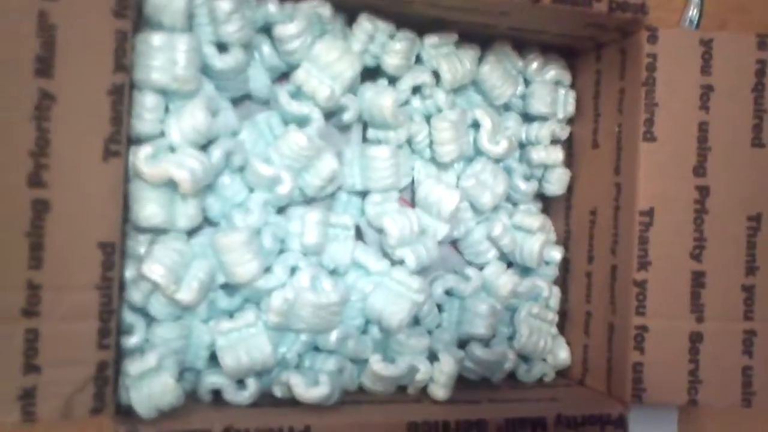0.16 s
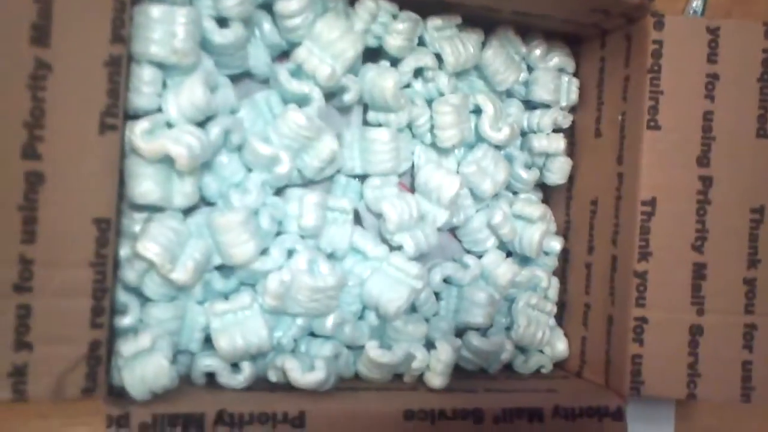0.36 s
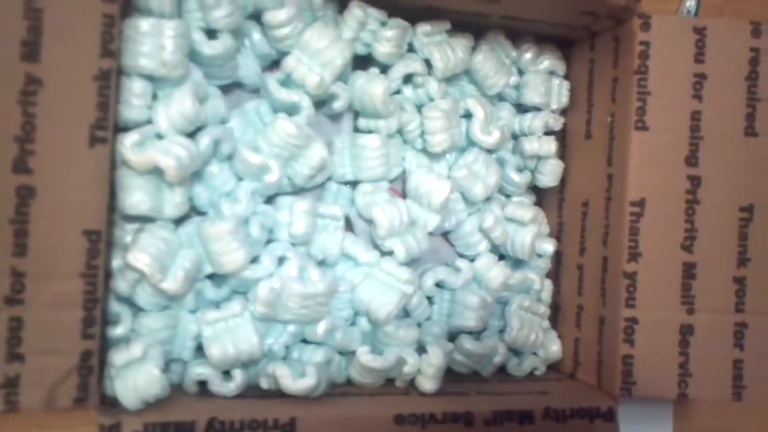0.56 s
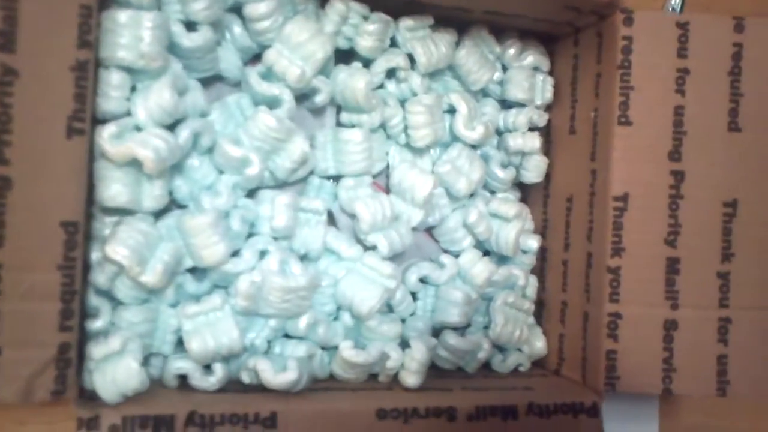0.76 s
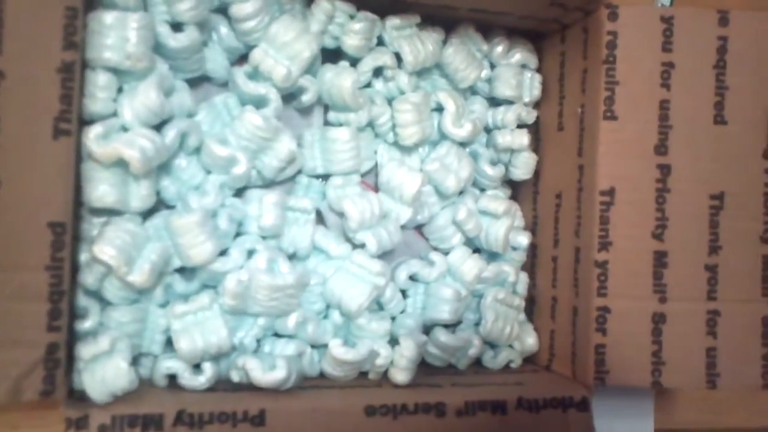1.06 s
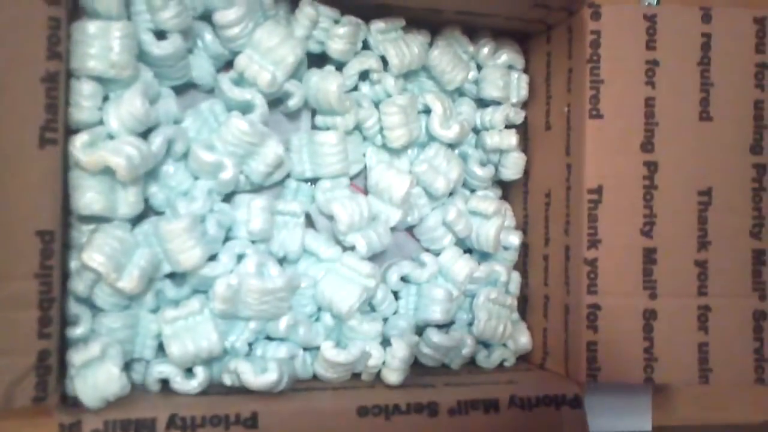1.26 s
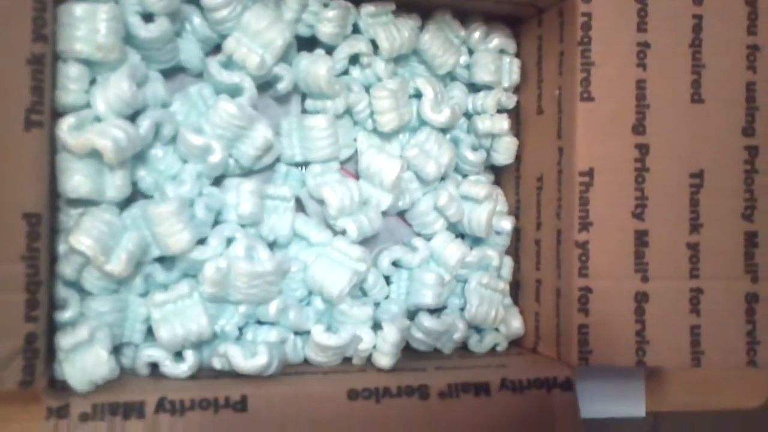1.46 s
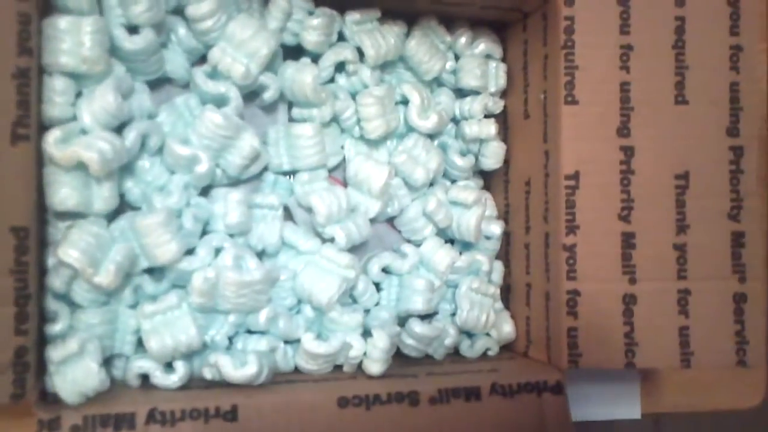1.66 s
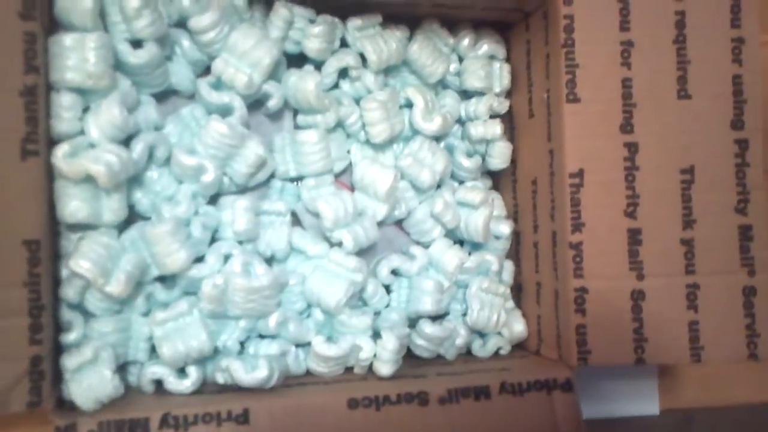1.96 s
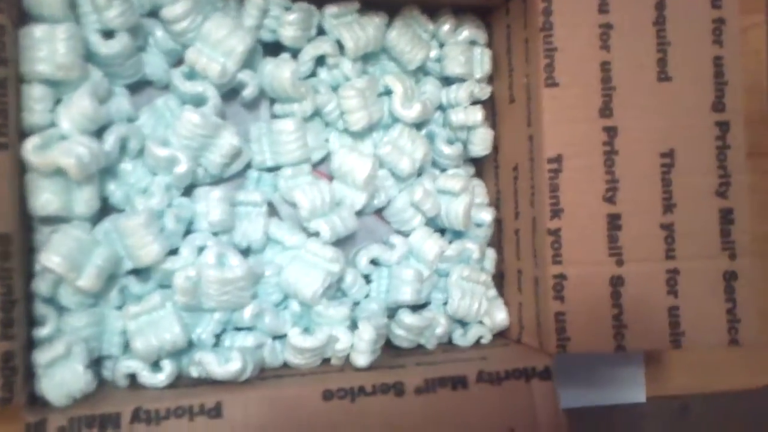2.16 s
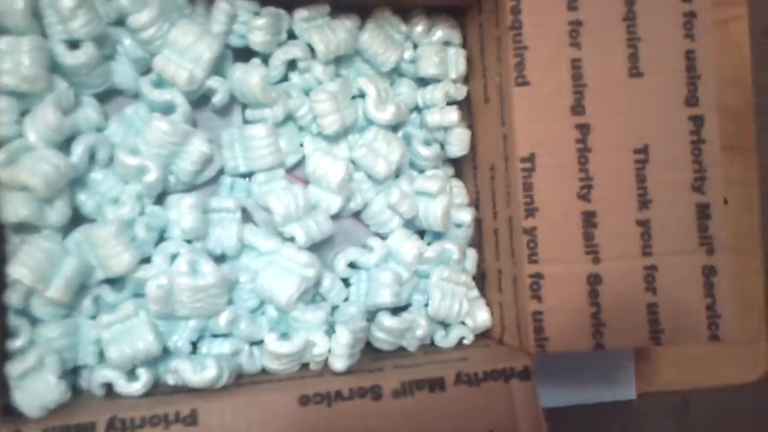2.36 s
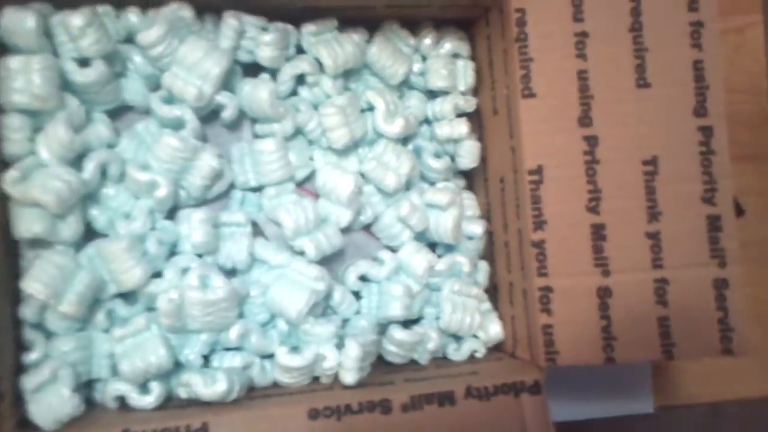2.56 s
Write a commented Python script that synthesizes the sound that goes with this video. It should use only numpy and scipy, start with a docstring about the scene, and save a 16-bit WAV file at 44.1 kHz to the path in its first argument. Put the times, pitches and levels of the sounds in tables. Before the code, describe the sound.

Foam packing peanuts rustle and snap crisply in a cardboard box, with faint low knocks

```python
"""A faint foam rustle and an early crisp snap open the scene; denser rustling, snaps and box knocks follow.
Foam packing peanuts shift in a cardboard box close to a small camera, in a quiet room.
Rustle, wall scrape and rumble are coloured noise under random contacts; snaps are short noise bursts.
Knocks ring the box modes, and the room is steady coloured noise.
The camera widens its two microphone ports by feeding each, inverted and delayed, into the other channel."""
import sys
import numpy as np
from scipy import signal
from scipy.fft import rfft, irfft, next_fast_len
from scipy.io import wavfile

SR = 44100
rng = np.random.default_rng(int(sys.argv[2]) if len(sys.argv) > 2 else 0)


def waveform_to_disk(signal):
    """Save audio, clipped to [-1, 1], as 16-bit WAV at the path in sys.argv[1]."""
    frames = np.transpose(np.atleast_2d(signal))
    scaled = np.clip(frames, -1, 1) * 32767
    samples = np.round(scaled).astype(np.int16)
    wavfile.write(sys.argv[1], SR, samples)


N = 119070  # samples, 2.7 s

# All levels are the mix ahead of the ports and the camera.
# Foam rustle over time: start_s, bright_level_db, dull_level_db
RUSTLE_LEVELS = [(0.0, -59, -60.5), (0.17, -70.5, -72), (0.238, -55, -60), (0.243, -44.5, -74),
                 (0.254, -42.5, -64), (0.26, -59, -61), (0.279, -55, -58), (0.3, -41.5, -57.5),
                 (0.32, -39.5, -43.5), (0.443, -42, -50), (0.444, -35.5, -36.5), (0.49, -53, -52),
                 (0.58, -44, -55), (0.65, -56.5, -58), (0.83, -58, -66), (0.866, -65, -61),
                 (0.875, -50.5, -56), (0.92, -50, -48), (0.94, -57, -61), (1.031, -50.5, -54.5),
                 (1.072, -65, -66), (1.212, -50.5, -51.5), (1.231, -59, -61.5), (1.4, -61.5, -62),
                 (1.44, -69, -66), (1.51, -55, -55.5), (1.65, -49.5, -53.5), (1.741, -58, -57.5),
                 (1.74, -56, -52), (1.79, -61, -62), (1.858, -59.5, -67), (1.866, -51, -56),
                 (1.96, -57, -59.5), (2.0, -55.5, -57.5), (2.18, -56.5, -57.5), (2.251, -49, -48),
                 (2.31, -56.5, -62), (2.391, -50, -53), (2.56, -65.5, -68.5), (2.7, -71, -71)]
# Single snaps of foam: start_s, peak_db (before SNAP_TRIM_DB), centre_hz
FOAM_SNAPS = [(0.033, -33.5, 7000), (0.196, -32.5, 9630), (0.2468, -21.5, 12300), (0.2832, -34, 9650),
              (0.2935, -27, 9490), (0.3013, -32, 9900), (0.3454, -30, 12000), (0.386, -17, 9900),
              (0.4234, -25, 12400), (0.4446, -31, 4600), (0.4472, -17.5, 3540), (0.503, -22.5, 9300),
              (0.5251, -27, 5300), (0.5484, -24, 7900), (0.717, -28, 11900), (0.783, -48, 9500),
              (0.7917, -33, 9500), (0.804, -45, 9500), (0.8073, -46, 9200), (0.831, -38, 9050),
              (0.8447, -42.5, 9000), (0.8733, -41, 9000), (1.0054, -27, 9770), (1.0246, -33.5, 7310),
              (1.1077, -29.5, 9400), (1.1476, -40, 11000), (1.179, -40, 10000), (1.2648, -29, 12000),
              (1.271, -35, 10600), (1.2758, -38, 10000), (1.3413, -35.5, 9960), (1.3683, -41, 11000),
              (1.375, -37.5, 9500), (1.385, -35.5, 8000), (1.3945, -38, 10000), (1.4682, -34, 7260),
              (1.4759, -36, 9120), (1.503, -27, 9600), (1.5504, -22.5, 9600), (1.571, -35, 3410),
              (1.634, -30, 9400), (1.6701, -33, 7300), (1.7465, -21, 10700), (1.7544, -32.5, 7510),
              (1.866, -32.5, 6900), (1.881, -34.5, 9970), (1.9817, -38.5, 3460), (1.989, -29.5, 7100),
              (2.0025, -28.5, 4840), (2.0164, -30, 8900), (2.0434, -24.5, 8450), (2.0476, -29, 6800),
              (2.127, -28, 11700), (2.1388, -33.5, 9980), (2.153, -28, 10200), (2.2496, -30, 4340),
              (2.6268, -40, 4860)]
# Knocks on the box: start_s, peak_db (before KNOCK_TRIM_DB and the low cut), centre_hz, width_octaves,
# ring_time_ratio
BOX_KNOCKS = [(0.274, -42, 490, 0.62, 0.3), (0.444, -21, 1220, 1, 0.45), (.904, -42.5, 466, 0.6, 1.2),
              (0.921, -47.5, 444, 0.46, 1.2), (1.518, -43.5, 382, 0.37, 1.6), (1.578, -40, 790, 0.74, 0.56),
              (1.713, -38, 865, 1.1, 1.9), (1.903, -40.5, 494, 0.85, 1.3), (1.982, -48, 786, 1.9, 0.89),
              (2.062, -44.5, 1000, 0.57, 0.63), (2.152, -45.5, 590, 0.29, 1.9),
              (2.191, -41.5, 402, 0.8, 0.82), (2.22, -42, 2200, 0.43, 0.46), (2.264, -34, 420, 0.85, 0.93),
              (2.27, -38, 162, 0.33, 4.3), (2.337, -47.5, 636, 0.12, 0.51), (2.357, -40.5, 387, 0.14, 0.58),
              (2.363, -45.5, 666, 0.22, 2.5), (2.387, -31.5, 510, 0.41, 1.08),
              (2.403, -36, 350, 0.66, 0.47), (2.416, -31.5, 288, 0.7, 2.14),
              (2.432, -34.5, 286, 0.67, 1.14), (2.413, -34.5, 101, 0.29, 1.6),
              (2.627, -46, 1240, 0.58, 0.45)]
# Resonances of the box, before each knock varies them: mode_hz, level_db, t60_s
BOX_MODES = [(100, 6, 0.085), (148, 9, 0.047), (290, -1, 0.059), (400, 0.5, 0.045), (491, -4, 0.046),
             (643, -4, 0.043), (954, -1, 0.038), (1429, -6.5, 0.035), (2000, -15, 0.012), (2307, -3, 0.046),
             (4900, -2, 0.0092)]
# Box wall over time: start_s, scrape_level_db, rumble_level_db
WALL_LEVELS = [(0.0, -66.5, -66), (0.23, -71.5, -66.5), (0.33, -64, -60), (0.443, -55.5, -66),
               (0.444, -40, -56.5), (0.649, -71.5, -69), (1.709, -69, -67), (1.714, -48.5, -62),
               (1.78, -70.5, -68.5), (2.38, -61, -61.5), (2.7, -69, -71)]
# Relative colours of the noise layers: frequency_hz, density_db (per Hz)
BRIGHT_COLOUR = [(3500, -16), (5500, -7), (7500, 1), (9500, -0.5), (11000, -1.5), (13000, -3.5),
                 (16000, -7.5)]
DULL_COLOUR = [(900, -7), (1700, -6), (2300, -0.5), (3500, 1.5), (5000, -3.5), (7000, -20.5)]
SCRAPE_COLOUR = [(400, -51), (800, -8.5), (1300, -3.5), (1800, -4.5), (3000, -20.5)]
RUMBLE_COLOUR = [(60, -7.5), (130, -5.5), (250, -1), (420, 3.5), (680, -4.5), (900, -8.5), (1500, -77)]
ROOM_COLOUR = [(20, 17), (60, 8), (150, 10.5), (400, -0.5), (800, -18), (2000, -47), (6000, -16),
               (12000, -45), (16000, -11.5)]
# Likeness of the two ports, before their lag: frequency_hz, correlation (0 to 1)
PORT_LIKENESS = [(100, 0.32), (500, 0.49), (1200, 0.25), (2500, 0.11), (5000, 0.1), (12000, 0.073)]
# Tilt between the ports: frequency_hz, left_over_right_db
PORT_LEAN = [(100, 12.5), (400, -7), (1000, -1.6), (2200, 2.5), (4800, -3), (6200, 0.5), (10000, 7.5),
             (15000, 1.5)]

SNAP_OCTAVES, SNAP_TRIM_DB = 0.69, -2.5
SNAP_T60_S, TAIL_T60_S, TAIL_DB = 0.0018, 0.023, -15.5
# Crackles are small snaps that follow the bright rustle level
CRACKLE_COUNT, CRACKLE_HZ, CRACKLE_OCTAVES = 500, 9200, 0.29
CRACKLE_TRIM_DB, CRACKLE_SPREAD_DB = 2, 3
KNOCK_TRIM_DB, KNOCK_LOW_HZ = -4.5, 126  # low cut that thins the bass thump of the knocks
MODE_SCATTER_DB, MODE_DETUNE, KNOCK_ATTACK_S = 2, 0.042, 0.00061
ROOM_DB = -64
PORT_LAG_S = 1.9e-4  # the right port hears later
CROSS_S, CROSS_GAIN, FEEDBACK = 16 / 44100, 1.08, 0.3761
LOW_CUT_HZ, TOP_HZ, GAIN_DB, OFFSET = 18, 15750, 3, -4e-4


def stirring():
    """Foam contacts, bright and dull, the wall scraped by them, and the wall's low rumble."""
    # The constant added to each envelope keeps steady noise under the contacts
    touch = contacts(700, spread_db=6, t60_s=0.0025)
    bright = layer(touch + 1.66, BRIGHT_COLOUR, RUSTLE_LEVELS, column=1)
    slow_touch = contacts(300, spread_db=8.5, t60_s=0.045)
    dull = layer(touch + 1.1 * slow_touch + 2.5, DULL_COLOUR, RUSTLE_LEVELS, column=2)
    scrape_touch = contacts(140, spread_db=-1.5, t60_s=0.016)
    scrape = layer(scrape_touch + 6.5, SCRAPE_COLOUR, WALL_LEVELS, column=1)
    rumble_touch = contacts(60, spread_db=10.0, t60_s=0.04)
    rumble = layer(rumble_touch + 8.0, RUMBLE_COLOUR, WALL_LEVELS, column=2)
    return bright + dull + scrape + rumble


def contacts(per_s, spread_db, t60_s):
    """Envelope of random contacts that start at once and die fast."""
    struck = rng.random(N) < per_s / SR
    strength = amp(spread_db * np.minimum(rng.exponential(size=N), 3.3))
    decay = amp(-60 / (t60_s * SR))  # per sample
    return unit(signal.lfilter([1], [1, -decay], struck * strength))


def layer(envelope, colour, levels, column):
    """Noise under an envelope, coloured, then following one column of a level table."""
    levels = np.transpose(levels)
    noise = envelope * rng.standard_normal((2, N))
    coloured = filtered(noise, lambda hz: amp(along(colour, hz)))
    level_db = np.interp(np.arange(N) / SR, levels[0], levels[column])
    return unit(coloured) * amp(level_db)


def snaps():
    """Foam snaps and crackles: each a few milliseconds of noise around its own centre, with a softer tail."""
    length, lead = 2048, 16  # samples; the lead leaves room for the filter to swell before the burst
    out = np.zeros((2, N + length))
    t = np.arange(length) / SR
    decay = amp(-60 * t / SNAP_T60_S) + amp(TAIL_DB - 60 * t / TAIL_T60_S)
    listed = [(*row, SNAP_OCTAVES) for row in FOAM_SNAPS]
    for start_s, peak_db, centre_hz, octaves in listed + list(crackles()):
        burst = rng.standard_normal((2, length)) * decay
        burst = np.pad(burst, ((0, 0), (lead, 0)))[:, :length]
        burst = filtered(burst, lambda hz: bump(hz, centre_hz, octaves))
        burst = burst / np.abs(burst).max(axis=1, keepdims=True)
        start = round(start_s * SR)
        out[:, start:start + length] += amp(peak_db + SNAP_TRIM_DB) * burst
    return out[:, :N]


def crackles():
    """Rows for many small snaps at random times, mostly weak, up to an octave either side of their centre."""
    when, size, pitch = rng.random((CRACKLE_COUNT, 3)).T
    start_s = when * N / SR
    rustle = np.transpose(RUSTLE_LEVELS)
    rustle_db = np.interp(start_s, rustle[0], rustle[1])
    peak_db = rustle_db + CRACKLE_TRIM_DB - CRACKLE_SPREAD_DB * np.log(size + 0.031)
    centre_hz = CRACKLE_HZ * 2 ** (2 * pitch - 1)
    return np.transpose([start_s, peak_db, centre_hz, np.full(CRACKLE_COUNT, CRACKLE_OCTAVES)])


def knocks():
    """A knock rings the box modes near its centre, each a decaying sine slightly detuned."""
    length = 4096  # samples
    out = np.zeros((2, N + length))
    t = np.arange(length) / SR
    mode_hz, mode_db, t60_s = np.transpose(BOX_MODES)[:, :, None]
    for start_s, peak_db, centre_hz, octaves, ring_ratio in BOX_KNOCKS:
        size, detune = rng.standard_normal((2, len(BOX_MODES), 1))
        phase = 1.05 * rng.standard_normal((2, len(BOX_MODES), 1))  # radians, differing by port
        decay = amp(mode_db + MODE_SCATTER_DB * size - 60 * t / (ring_ratio * t60_s))
        tone = np.sin(2 * np.pi * mode_hz * (1 + MODE_DETUNE * detune) * t + phase)
        modes = decay * bump(mode_hz, centre_hz, octaves) * tone
        ring = modes.sum(axis=1) * (1 - np.exp(-t / KNOCK_ATTACK_S))
        start = round(start_s * SR)
        out[:, start:start + length] += amp(peak_db + KNOCK_TRIM_DB) * ring / np.abs(ring).max()
    return filtered(out[:, :N], lambda hz: low_cut(hz, KNOCK_LOW_HZ))


def room():
    """Steady low murmur of the room and hiss, as coloured noise."""
    noise = rng.standard_normal((2, N))
    return amp(ROOM_DB) * unit(filtered(noise, lambda hz: amp(along(ROOM_COLOUR, hz))))


def alike(pair):
    """Two unrelated signals blended so that the ports are most alike in the lows."""
    def shares(hz):
        turn = np.arccos(np.clip(along(PORT_LIKENESS, hz), -1, 1)) / 2
        return np.array([np.cos(turn), np.sin(turn)])

    mid, side = filtered(pair, shares)
    return np.sqrt(.5) * np.array([mid + side, mid - side])


def ports(pair):
    """The two ports lean by frequency, and the right one lags."""
    half = np.array([[.5], [-.5]])  # left, right

    def response(hz):
        lean = amp(along(PORT_LEAN, hz) * half)
        lag = np.exp(2j * np.pi * hz * PORT_LAG_S * half)
        return lean * lag

    return filtered(pair, response)


def amp(db):
    """Amplitude ratio of a level in dB."""
    return 10 ** (np.asarray(db) / 20)


def unit(x):
    """Signal scaled to an RMS of one."""
    return x / np.sqrt(np.mean(x ** 2) + 1e-20)


def along(points, hz):
    """Curve through (Hz, value) points on a log frequency axis."""
    point_hz, value = np.transpose(points)
    return np.interp(np.log(hz + 1), np.log(point_hz + 1), value)


def bump(hz, centre_hz, octaves):
    """Bell-shaped gain around a centre, its width in octaves."""
    return np.exp(-.5 * (np.log2((hz + 1) / centre_hz) / octaves) ** 2)


def low_cut(hz, corner_hz):
    """Two first-order low cuts in a row."""
    return (1j * hz / (1j * hz + corner_hz)) ** 2


def filtered(x, response):
    """Signal shaped by a complex response of frequency."""
    size = next_fast_len(x.shape[-1] + 4096)
    spectrum = rfft(x, size) * response(np.fft.rfftfreq(size, 1 / SR))
    return irfft(spectrum, size)[..., :x.shape[-1]]


def scene():
    """Foam, snaps and room share the port likeness; knocks join after it, and the ports hear all."""
    blended = alike(stirring() + snaps() + room())
    return ports(blended + knocks())


def record(dry):
    """Low cut; each port is subtracted, delayed, from the other channel, with feedback; offset and band limit."""
    def widen(hz):
        # Swapping channels keeps the mid and flips the side
        late = np.exp(-2j * np.pi * hz * CROSS_S) * np.array([[1], [-1]])
        return low_cut(hz, LOW_CUT_HZ) * (1 - CROSS_GAIN * late) / (1 - FEEDBACK * late)

    left, right = dry
    mid, side = filtered(np.array([left + right, left - right]) / 2, widen)
    wide = np.array([mid + side, mid - side])
    return filtered(wide, lambda hz: amp(GAIN_DB) * (hz < TOP_HZ)) + OFFSET


dry = scene()
out = record(dry)
waveform_to_disk(out)
```